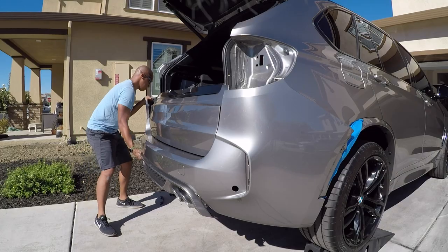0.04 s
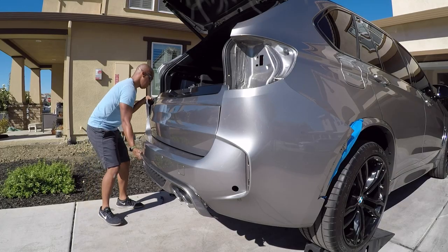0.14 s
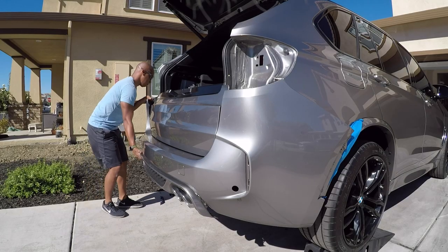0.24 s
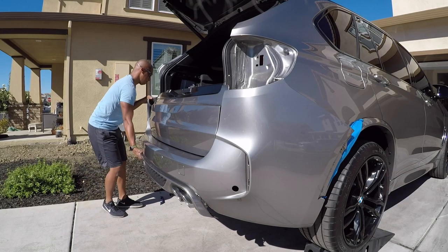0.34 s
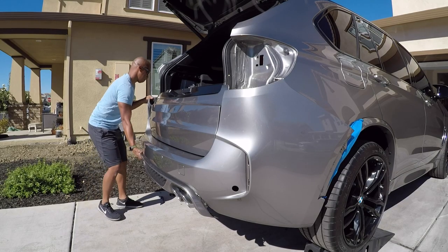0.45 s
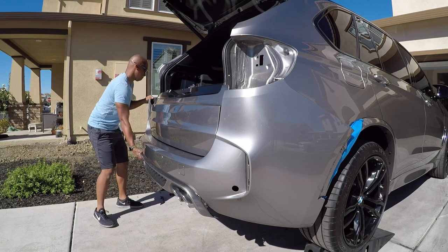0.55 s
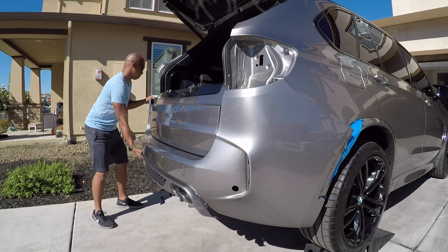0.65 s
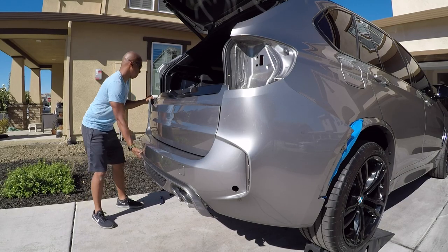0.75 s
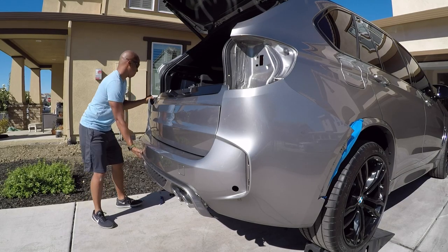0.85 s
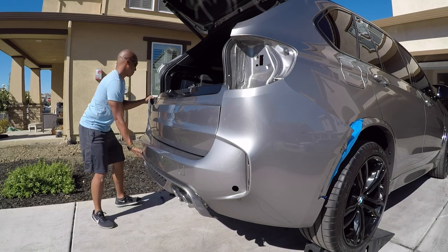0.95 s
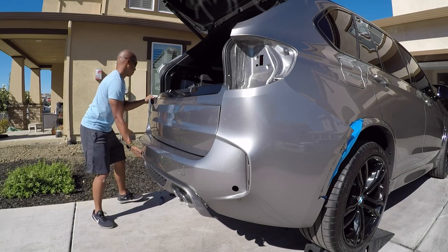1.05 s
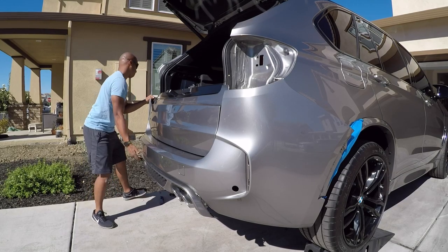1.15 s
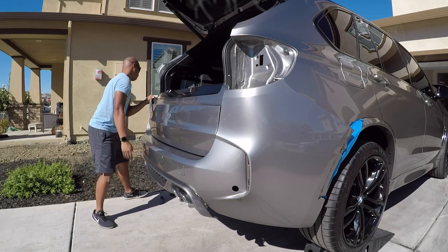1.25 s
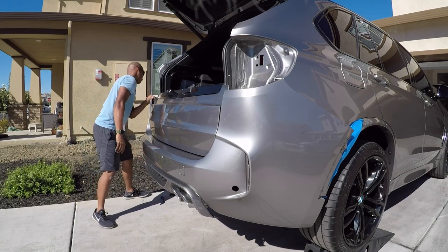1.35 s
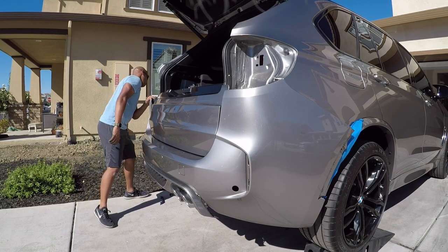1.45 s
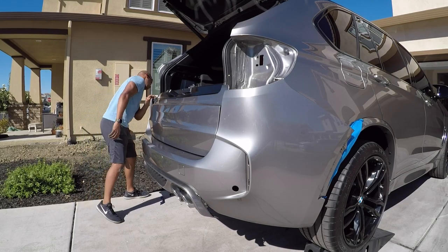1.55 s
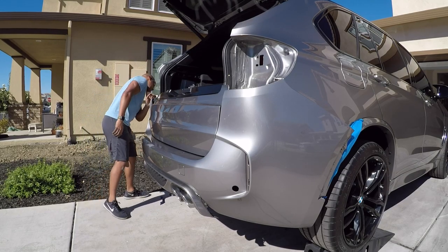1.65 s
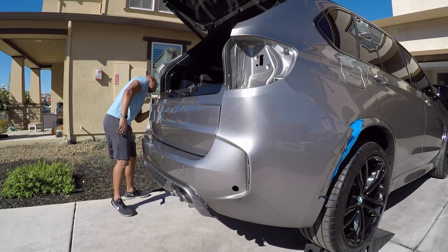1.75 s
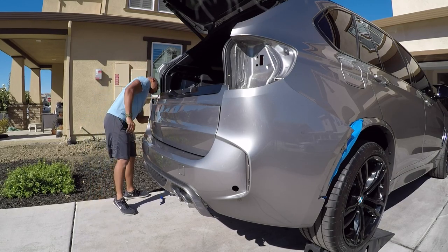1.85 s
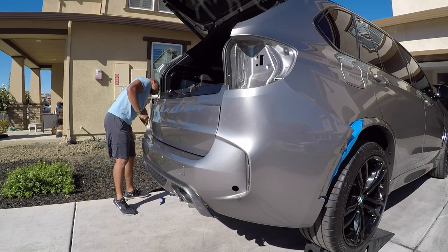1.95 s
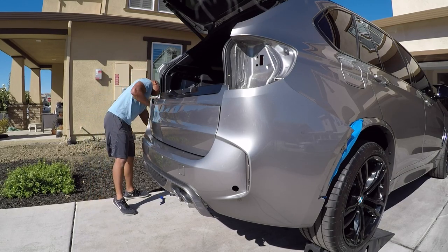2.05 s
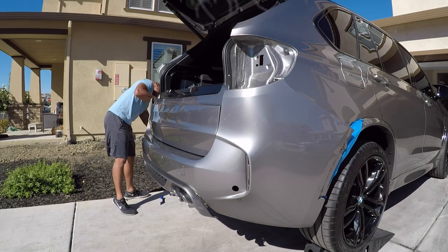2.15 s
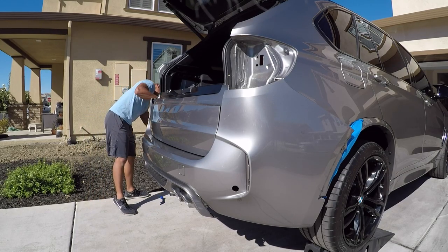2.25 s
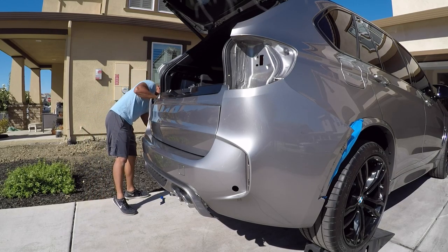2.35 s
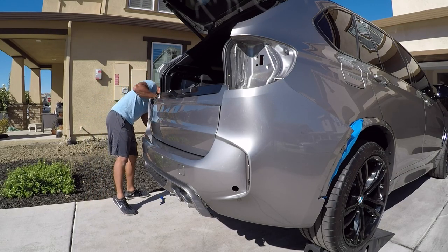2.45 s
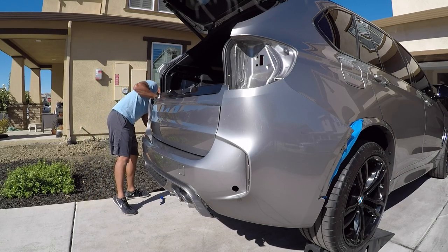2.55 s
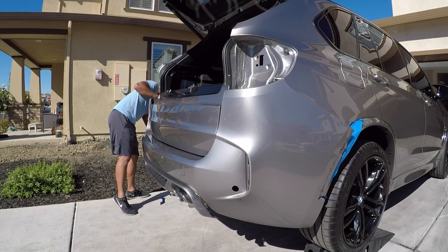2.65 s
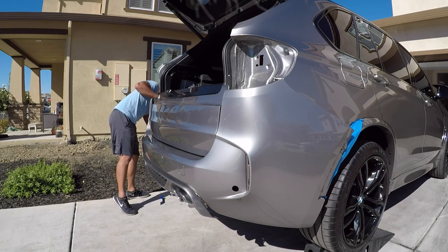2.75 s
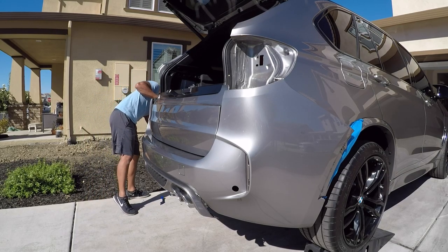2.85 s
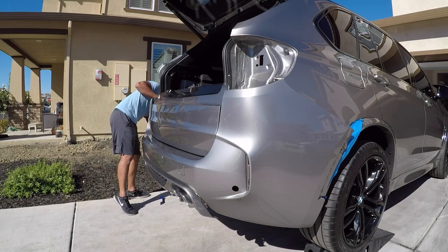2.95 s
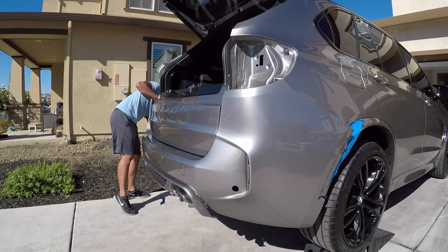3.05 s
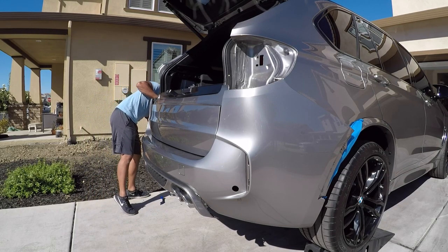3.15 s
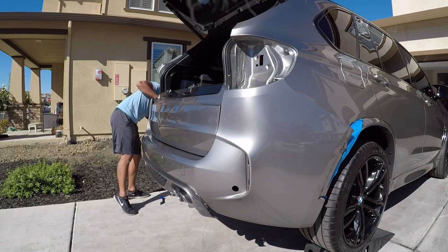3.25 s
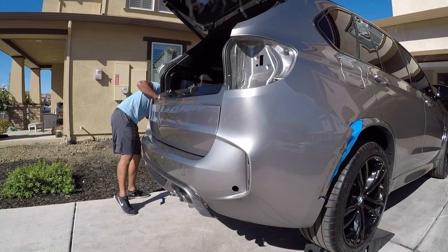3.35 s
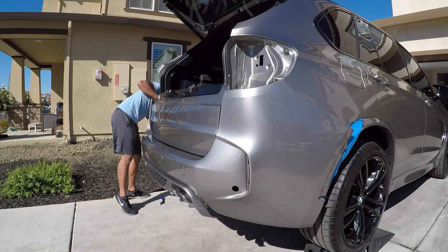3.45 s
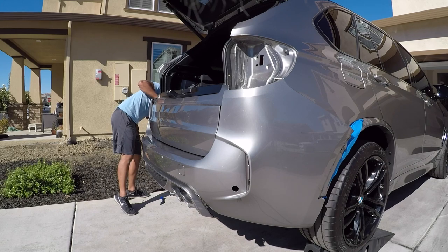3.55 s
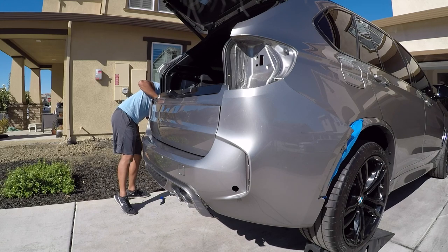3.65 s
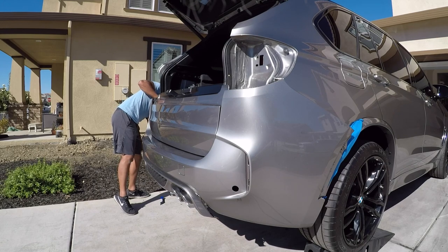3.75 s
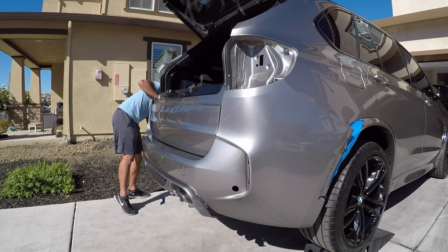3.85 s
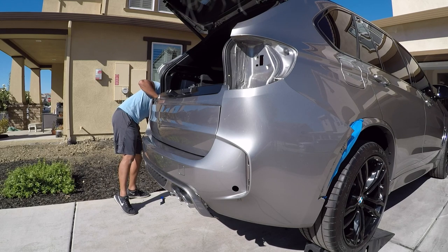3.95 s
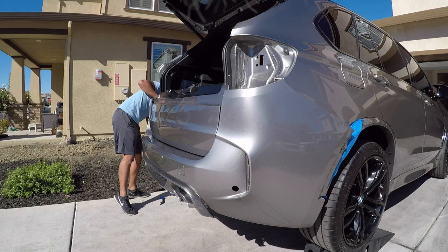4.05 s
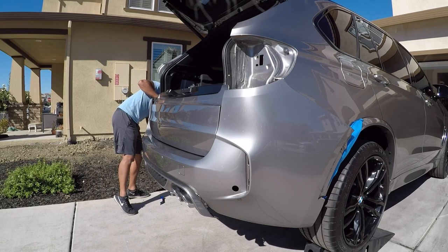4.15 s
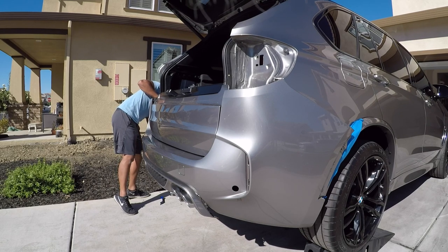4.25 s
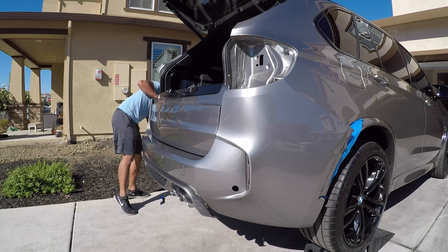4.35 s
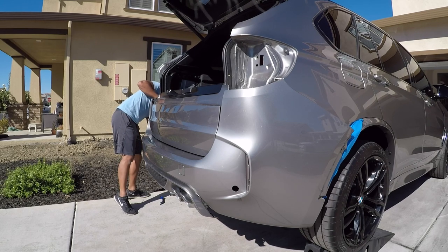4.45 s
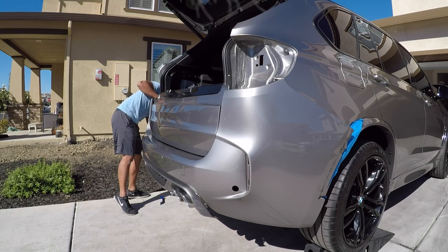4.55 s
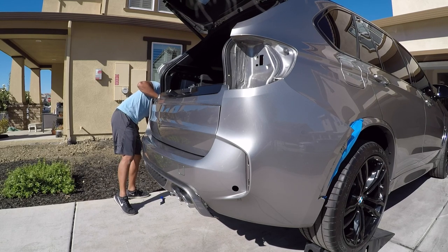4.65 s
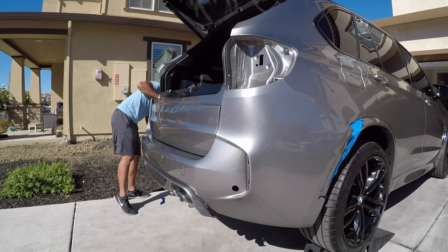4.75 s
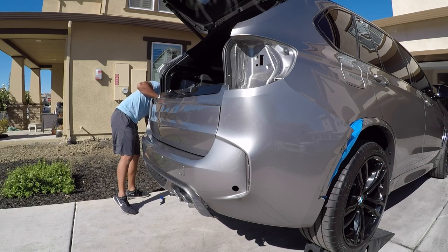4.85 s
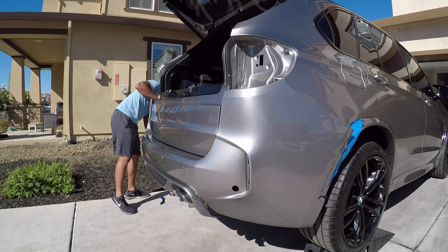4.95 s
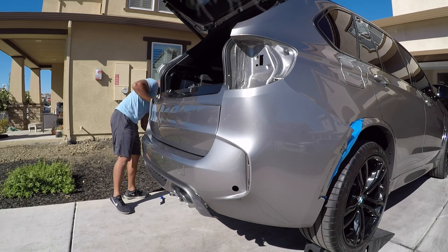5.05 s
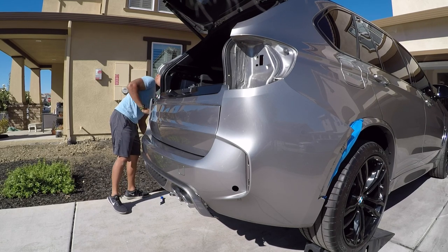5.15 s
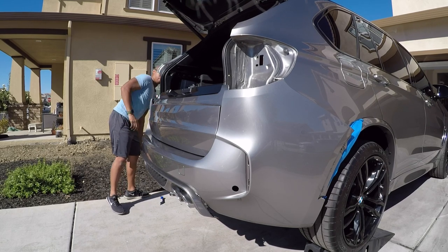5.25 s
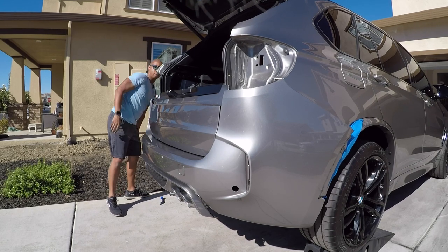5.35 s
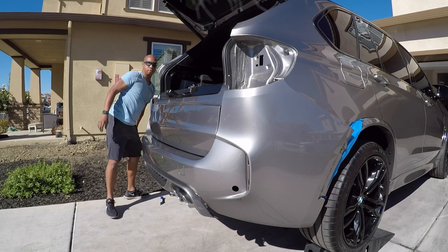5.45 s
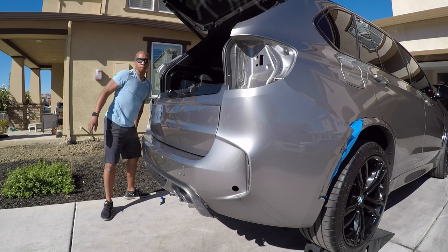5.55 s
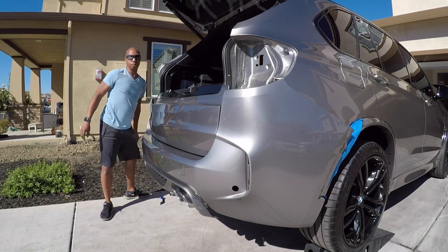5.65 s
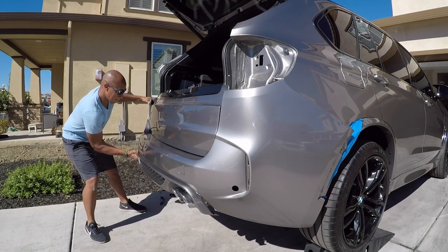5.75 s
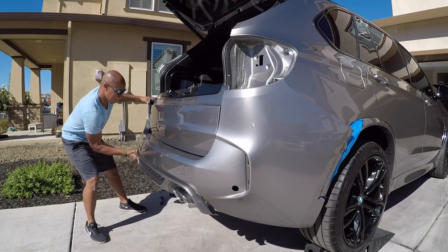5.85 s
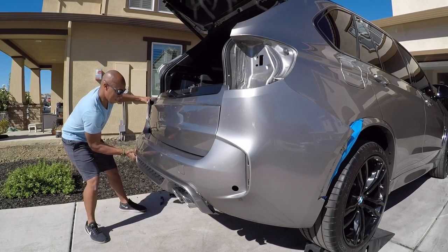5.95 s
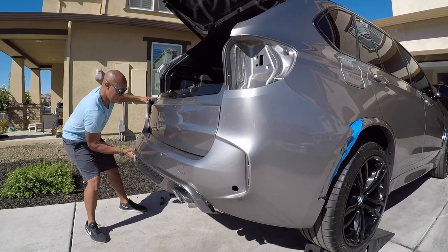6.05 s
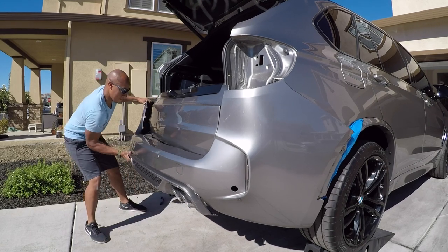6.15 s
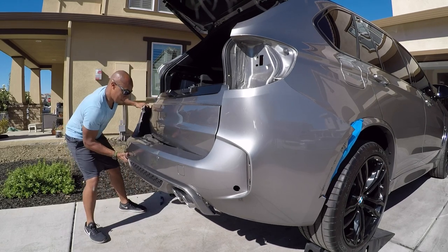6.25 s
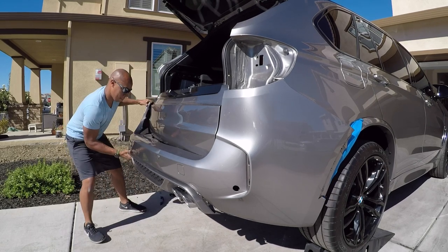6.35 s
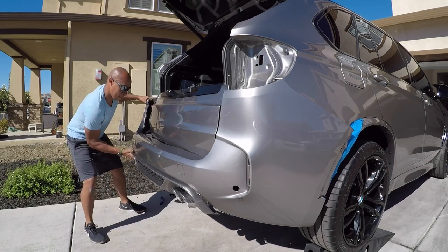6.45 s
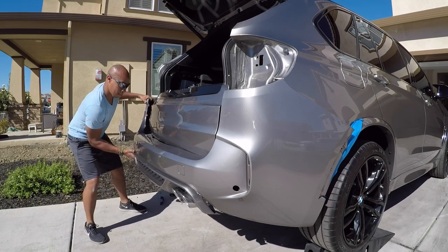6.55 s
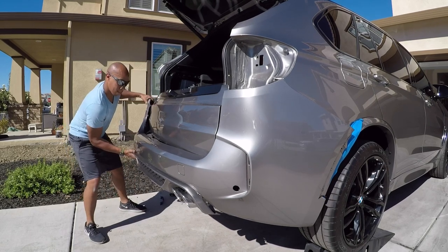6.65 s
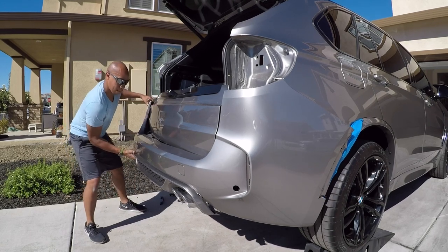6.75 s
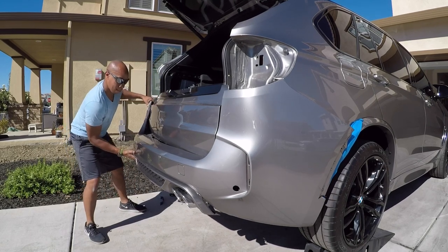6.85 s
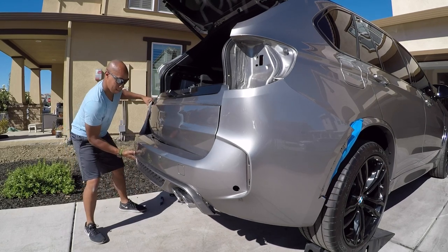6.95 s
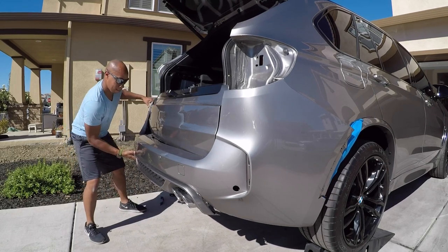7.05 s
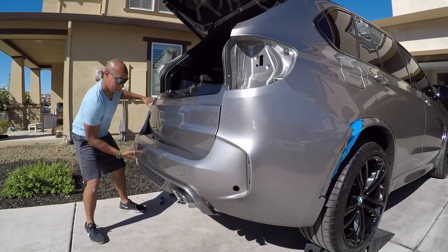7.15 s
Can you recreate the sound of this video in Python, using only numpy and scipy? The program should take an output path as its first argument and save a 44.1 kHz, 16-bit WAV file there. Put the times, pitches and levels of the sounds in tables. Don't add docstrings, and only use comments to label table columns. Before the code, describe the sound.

Outdoors on a driveway, someone works a car's plastic bumper cover loose. Sparse faint clip ticks, edge creaks, scuffs and small panel knocks come over far traffic hum and light breeze on the microphone. After a quieter pause, soft palm thumps lead into a very loud double crack as the catches tear, then hollow rattling and bumps fade into a few last taps. House walls return short dull echoes.

```python
import sys
import numpy as np
from scipy import signal
from scipy.io import wavfile

SR = 44100
rng = np.random.default_rng(int(sys.argv[2]) if len(sys.argv) > 2 else 0)


def unload_wav(signal):
    wavfile.write(
        sys.argv[1],
        SR,
        np.round(np.clip(np.atleast_2d(signal).T, -1, 1) * 32767).astype(np.int16),
    )


def invert_db(level):
    return 10 ** (np.asarray(level, dtype=float) / 20)


N = 317851

# pitch in Hz, level in dB, time to fade by 60 dB in s.
COVER_MODES = [(82.6, -12.5, 0.21), (119.6, -6, 0.2), (177, 0, 0.077), (197.4, -3, 0.061),
               (237.7, -2.5, 0.27), (284, -9.5, 0.026), (400, -10, 0.13), (474, -13.5, 0.05),
               (661, -8.5, 0.28), (774, -12.5, 0.3), (938, -14, 0.056), (1067, -9.5, 0.023),
               (1696, -11, 0.032), (1885, -10, 0.11)]


def rms_one(x):
    return x / np.sqrt(np.mean(x ** 2) + 1e-20)


def band(x, low_hz, high_hz, order=2):
    high_hz = min(high_hz, 0.45 * SR)
    return signal.sosfilt(signal.butter(order, [low_hz, high_hz], "band", fs=SR, output="sos"), x)


def drift(rate_hz):
    r = np.exp(-2 * np.pi * rate_hz * 40 / SR)
    slow = signal.lfilter([1], [1, -2 * r, r * r], rng.standard_normal(N // 40 + 2002))
    slow = slow[2000:]
    return np.interp(np.arange(N) / 40, np.arange(len(slow)), rms_one(slow))


def ring(force, hz, t60):
    r = invert_db(-60 / (max(t60, 0.005) * SR))
    w = 2 * np.pi * hz / SR
    gain = 2 * np.sqrt(1 - r) * np.sin(w)
    return signal.lfilter([0, gain], [1, -2 * r * np.cos(w), r * r], force + 1e-18)


def grit(size, per_s, spread_db):
    strength_db = spread_db * np.minimum(rng.exponential(1, size), 4)
    impacts = invert_db(strength_db) * rng.choice([-1, 1], size)
    return rms_one(impacts * (rng.random(size) < per_s / SR))


def add(out, s, sound):
    at = round(s * SR)
    out[at:at + len(sound)] += sound[:N - at]


def street():
    # pitch in Hz, noise level in dB per Hz.
    spectrum = np.array([(24, -31), (40, -7), (114, 0), (143, -12), (213, -8), (241, -18), (317, -12.5),
                         (359, -16.5), (427, -12), (472, -18.5), (758, -17.5), (2110, -31.5), (12300, -43),
                         (15500, -51)])
    # time in seconds, loudness in dB.
    loudness = [(0.0, -60), (0.79, -61.5), (5.27, -62), (5.7, -60)]
    # pitch in Hz, width in Hz, level in dB.
    hums = [(115, 4, -80.5), (222.6, 4.5, -68.5), (749, 26, -80.5)]
    edges = 40 * 2 ** np.arange(0, 9, 0.5)
    white = rng.standard_normal((2, N))
    together = drift(1.0)
    out = np.zeros(N)
    for k, (low, high) in enumerate(zip(edges, edges[1:])):
        level_db = np.interp(np.log(low * high) / 2, np.log(spectrum[:, 0]), spectrum[:, 1])
        flicker_db = 0.44 * together + 1.6 * drift(2.7)
        out += invert_db(level_db + flicker_db) * band(white[k % 2], low, high)
    loudness_db = np.interp(np.arange(N) / SR, *np.transpose(loudness))
    out = out / np.std(band(out, 270, 1700)) * invert_db(loudness_db + 0.09)
    for hz, width, db in hums:
        hum = band(rng.standard_normal(N), hz - width / 2, hz + width / 2, order=1)
        out += invert_db(db + 1.1 * drift(0.95)) * rms_one(hum)
    return out


def breeze():
    # time in seconds, push in dB.
    gusts = [(0.0, -37.5), (0.86, -44.5), (1.42, -29), (2.15, -25), (2.35, -45.5), (2.45, -31.5),
             (3.65, -32.5), (3.73, -17), (3.93, -34.5), (4.03, -19.5), (5.2, -32), (5.3, -32.5),
             (5.86, -23), (6.0, -32.5), (6.42, -15), (6.5, -28), (6.95, -16), (7.21, -42)]
    push_db = np.interp(np.arange(N) / SR, *np.transpose(gusts))
    push = band(drift(8.9), 2.4, 9.7, order=1)
    flutter = band(rng.standard_normal(N), 7.7, 49) * invert_db(2.8 * drift(5.4))
    flutter_db = -55.5 + 0.85 * (push_db - push_db.mean())
    return invert_db(push_db) * rms_one(push) + invert_db(flutter_db) * rms_one(flutter)


def walls(x):
    level_db, t60_s, gap_s = -42.5, 0.36, 0.014
    t = np.arange(int(SR * 0.6)) / SR
    decay = (1 - np.exp(-(t / gap_s) ** 2)) * invert_db(level_db - 60 * t / t60_s)
    echo = signal.fftconvolve(x, decay * rng.standard_normal(len(t)))[:N]
    return band(band(echo, 140, 2100, order=1), 100, 9000, order=1)


def thumps():
    # start in seconds, peak in dB, fade time of the push in s.
    palms = [
        (5.743, -32, 0.079),
        (5.872, -36, 0.07),
        (5.893, -30, 0.082),
        (5.969, -40.5, 0.035),
    ]
    # pitch in Hz, level in dB, time to fade by 60 dB in s.
    hollow = [(239, 5, 0.057), (308.3, -4.5, 0.032), (405, -1.5, .035)]
    out = np.zeros(N)
    t = np.arange(int(SR * 0.2)) / SR
    for s, peak_db, t60 in palms:
        push = band(rng.standard_normal(len(t)), 150, 400) * invert_db(-60 * t / max(t60, 0.01))
        sound = sum(invert_db(db) * ring(push, hz, ring_s) for hz, db, ring_s in hollow)
        add(out, s, invert_db(peak_db - 2.5) * sound)
    return out


def rubs():
    # middle in seconds, half length in s, level in dB, pitch in Hz.
    scuffs = [(0.202, 0.022, -52, 2880), (0.21, 0.044, -57, 1160), (0.193, 0.017, -65, 8500),
              (0.343, .0095, -66.5, 4050), (0.494, 0.019, -55.5, 700), (0.752, .023, -63.5, 2500),
              (1.485, .025, -70, 3930), (2.295, .027, -60.5, 3400), (2.393, 0.023, -52, 217),
              (2.39, 0.011, -54, 3080), (2.77, 0.033, -66.5, 2010), (3.238, 0.035, -61.5, 4000),
              (3.451, 0.057, -70, 2620), (4.435, 0.15, -76, 2960), (4.564, 0.025, -54.5, 685),
              (4.62, 0.025, -46, 213), (5.897, 0.017, -58.5, 1890), (6.879, 0.039, -51, 328),
              (7.025, .072, -58.5, 510), (7.167, 0.046, -58.5, 109)]
    # middle in seconds, half length in s, level in dB, pitch in Hz.
    groans = [(1.248, 0.79, -66.5, 860), (1.453, .057, -54.5, 800), (1.617, .043, -63, 400),
              (1.852, 0.15, -70, 1390), (3.599, 0.21, -69.5, 1770), (6.117, 0.078, -39.5, 55),
              (3.262, 0.033, -50.5, 188), (4.16, .068, -60.5, 1520), (4.192, 0.066, -58, 400),
              (6.56, 0.13, -52, 131.5), (6.912, 0.15, -59.5, 908), (7.19, .039, -57.5, 980)]
    out = np.zeros(N)
    t = np.arange(N) / SR
    for rows, octaves in (scuffs, 1.5), (groans, 0.89):
        for s, half, db, hz in rows:
            near = slice(max(round((s - 0.7) * SR), 0), round((s + 0.7) * SR))
            slide = band(grit(int(1.5 * SR), 12000, 2.5), hz / 2 ** (octaves / 2), hz * 2 ** (octaves / 2))
            swell = np.exp(-0.5 * ((t[near] - s) / half) ** 2)
            out[near] += invert_db(db) * swell * rms_one(slide)[:len(t[near])]
    return out


def rattle():
    # time in seconds, level in dB.
    shaking = [
        (6.12, -46),
        (6.206, -72),
        (6.268, -44),
        (6.364, -44.5),
        (6.464, -47),
        (6.62, -60),
    ]
    s, db = np.transpose(shaking)
    panel_db = np.interp(np.arange(N) / SR, s, db, -120, -120)
    shake = grit(N, 4000, 3.5) * invert_db(2.2 * drift(30))
    panel = rms_one(band(shake, 220, 1500))
    bright = rms_one(band(band(shake, 1900, 3100, order=1), 990, 6000))
    return invert_db(panel_db) * panel + invert_db(panel_db - 14.5) * bright


def ticks():
    # start in seconds, peak in dB, middle pitch in Hz, fade time in s.
    tabs = [(0.3807, -53, 3700, 0.045), (1.3518, -55.5, 5580, 0.048), (2.5466, -53.5, 4300, 0.032),
            (2.842, -56, 3190, 0.04), (3.408, -49, 5280, 0.029), (3.4253, -47, 3610, 0.035),
            (3.8695, -58, 4100, 0.034), (4.37, -62, 3600, 0.022), (4.522, -51, 3200, 0.04),
            (5.6096, -56, 3260, 0.04), (5.63, -57, 3070, 0.04)]
    out = np.zeros(N)
    t = np.arange(int(SR * 0.1)) / SR
    for s, peak_db, hz, t60 in tabs:
        snap = rms_one(band(grit(len(t), 12000, 2.0), hz / 1.9, hz * 1.9, order=1))
        add(out, s - 0.001, invert_db(peak_db - 7.5 - 60 * t / max(t60, 0.01)) * snap)
    return out


def pings_and_taps():
    # start in seconds, pitch in Hz, level in dB, fade time in s.
    pings = [
        (3.512, 1650, -54, .25),
        (3.52, 1710, -56, .25),
        (3.512, 1400, -57, .1),
    ]
    # start in seconds, pitch in Hz, level in dB, fade time in s.
    taps = [
        (2.44, 746, -38, 0.038),
        (2.546, 740, -48.5, 0.047),
        (2.842, 740, -50.5, 0.045),
        (6.568, 800, -41, .08),
        (6.925, 1150, -40, .07),
    ]
    out = np.zeros(N)
    t = np.arange(int(SR * 0.2)) / SR
    for rows, rise_s in (pings, 0.008), (taps, 0.002):
        for s, hz, db, t60 in rows:
            envelope = invert_db(db - 60 * t / t60) * (1 - np.exp(-t / rise_s))
            add(out, s, envelope * np.sin(2 * np.pi * hz * t))
    return out


def contacts(events, modes, gain_db, wide_db, top_db, fade_db, scatter_db, rise, uneven_db):
    out = np.zeros(N)
    t = np.arange(int(SR * 0.4)) / SR
    edges = 150 * 2 ** np.arange(0, 7.5, 0.75)
    shape_hz = np.log([280, 600, 1500, 3800, 9000, 16000])
    for s, mid_db, body_db, edge_db, click_db, t60 in events:
        force = grit(len(t), 12000, uneven_db)
        force = force * (1 - np.exp(-t / max(rise, 3e-4))) * invert_db(-60 * t / max(t60, 0.01))
        luck_db = rng.normal(0, scatter_db, len(modes))
        shape_db = [body_db, 0, 0, edge_db, click_db, click_db + top_db]
        sound = np.zeros(len(t))
        for k, (low, high) in enumerate(zip(edges, edges[1:])):
            tilt_db = np.interp(np.log(low * high) / 2, shape_hz, shape_db)
            noise = band(force * invert_db(-fade_db * high * t), low, high)
            sound += (-1) ** k * invert_db(wide_db + tilt_db) * np.sqrt(SR / high) * noise
        for k, (hz, level_db, ring_s) in enumerate(modes):
            tone_db = level_db + np.interp(np.log(hz), shape_hz, shape_db) + luck_db[k]
            sound += (-1) ** k * invert_db(tone_db) * ring(force, hz, ring_s)
        add(out, s, invert_db(mid_db + gain_db) * sound)
    return out


def kind(rows, dull_db, t60=None):
    return [(*row[:4], row[3] - dull_db, t60 or row[4]) for row in rows]


def handling():
    # start in seconds, peak in dB, weight in dB, hardness in dB, chatter fade time in s.
    knocks = [(0.478, -47.5, 1, -20, 0.17), (0.514, -47, 8, -5, 0.093), (0.716, -34.5, -11, -19, 0.18),
              (1.352, -47.5, -1, -19, 0.24), (1.455, -43.5, 6, -36, .13), (1.603, -52, 15.5, -20, 0.1),
              (2.261, -31, -9, -8, 0.2), (2.373, -44.5, -9, 14, .15), (2.44, -42, -33, -14, 0.045),
              (2.545, -45, -31, -21, 0.037), (2.762, -48.5, -10, -8, 0.1), (2.841, -50, -17, -24, 0.056),
              (3.19, -26.5, -3.5, -13, 0.1), (3.224, -44, -12, -6, 0.17), (4.542, -45, 4, -16, 0.085),
              (4.596, -36.5, 9, -11.5, 0.089), (5.607, -49, -22, -21, 0.11), (5.967, -48, -10.5, -17, .1)]
    # start in seconds, peak in dB, weight in dB, hardness in dB.
    creaks = [(0.001, -51.5, 13, 4), (0.377, -54.5, -11, 11), (1.295, -54, -8, 0), (1.748, -53.5, -1, 7.5),
              (1.762, -57, -4, 3), (2.304, -50, -1, 10), (2.663, -51, -5, -3), (2.784, -55, -1, -5),
              (3.158, -59, -8, 19), (3.324, -56.5, -2, 13), (3.482, -47.5, -30, 8), (3.505, -55, -22, -2),
              (3.87, -58, -1, 9), (4.323, -52.5, -11, -6), (4.37, -59, -19, 16), (4.445, -55, -15, 4),
              (5.51, -52.5, -17, 5), (5.847, -42.5, -31, 7)]
    # start in seconds, peak in dB, weight in dB, hardness in dB.
    snaps = [(1.524, -42, 11.5, -12), (2.336, -42.5, 1, -1), (3.135, -47, -15, -5), (3.181, -36, -40, -5),
             (3.406, -57, -21, 0), (4.495, -51.5, -3, -2), (4.523, -52.5, 7, -1), (6.078, -39, -12, 30.5),
             (6.516, -54, -10, 6), (6.553, -51, 6, 7), (6.567, -35, -34, 5)]
    # pitch in Hz, level in dB, time to fade by 60 dB in s.
    trim = [(160, -9, 0.099), (241.4, -12.5, 0.068), (369, -6, 0.032), (462, 0, 0.12), (670, -14.5, 0.014),
            (715, -10, 0.13), (970, -17.5, 0.017), (1137, -7.5, 0.11), (1445, -4.5, 0.0073),
            (1430, -11.5, 0.07), (1744, -12.5, 0.051)]
    touches = kind(knocks, 9) + kind(creaks, 20, t60=0.057) + kind(snaps, -1, t60=0.075)
    return contacts(touches, trim, gain_db=-9, wide_db=0.5, top_db=2.5, fade_db=0.2047,
                    scatter_db=4.0, rise=0.002, uneven_db=1.0)


def bumps():
    # start in seconds, peak in dB, weight in dB, hardness in dB, chatter fade time in s.
    knocks_back = [(6.285, -22.5, 0, -30, .12), (6.305, -29, -8, -30, 0.085), (6.326, -29, 4, -30, 0.18),
                   (6.446, -36.5, -11, 2.5, .1), (6.455, -18.5, -5, -20, .14), (6.48, -28, 1.5, -25, 0.14),
                   (6.51, -37, 10.5, -32, 0.11), (6.646, -35, -0.5, -5.5, 0.2),
                   (6.856, -36, 1.5, -29.5, 0.13), (6.922, -33.5, -3, -38, 0.071),
                   (6.999, -30.5, -2.5, -44, 0.12)]
    return contacts(kind(knocks_back, 9.5), COVER_MODES, gain_db=-15.5, wide_db=6.5, top_db=1, fade_db=0.13,
                    scatter_db=3.5, rise=0.0039, uneven_db=3.5)


def cracks():
    # start in seconds, peak in dB, weight in dB, hardness in dB, drop of the top below it in dB.
    catches = [
        (6.041, -2.5, -1.5, -8.5, 15),
        (6.054, -1.5, 3, -9, 21),
        (6.081, -3.5, 2.5, 0.5, 4),
        (6.088, -6, 1.5, -2.5, 17),
        (6.104, -11.5, 1.5, -14.5, 6),
        (6.118, -18, 7.5, -7, 10),
        (6.137, -20.5, 14.5, -6.5, 13),
    ]
    tears = [(*row[:4], row[3] - row[4], 0.072) for row in catches]
    return contacts(tears, COVER_MODES, gain_db=-8.0, wide_db=0.5, top_db=-11.5, fade_db=-0.014,
                    scatter_db=3.0, rise=0.0024, uneven_db=4.0)


def scene():
    air = street() + breeze()
    cover = thumps() + rubs() + rattle() + ticks() + pings_and_taps() + handling() + bumps() + cracks()
    return (cover + walls(cover) + air)[None]


def band_limit(x):
    return signal.sosfilt(signal.butter(12, 16440, fs=SR, output="sos"), x)


def record(dry):
    rounded = 0.97 * np.tanh(dry / 0.97)
    top_cut = signal.cheby2(10, 60, 16200, fs=SR, output="sos")
    return band_limit(signal.sosfilt(top_cut, rounded))


dry = scene()
out = record(dry)
unload_wav(out)
```